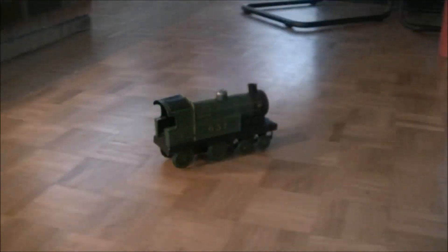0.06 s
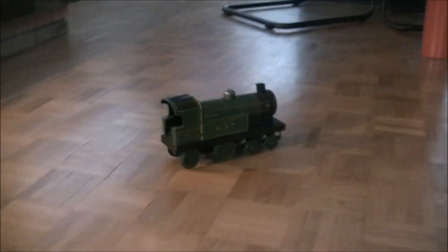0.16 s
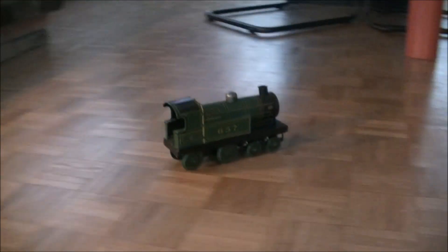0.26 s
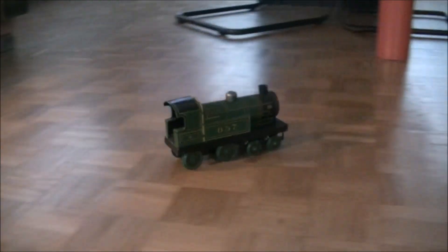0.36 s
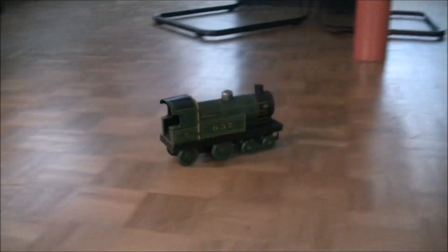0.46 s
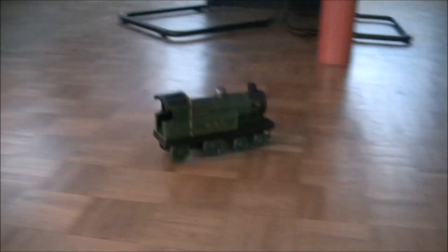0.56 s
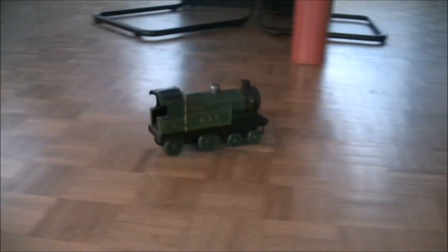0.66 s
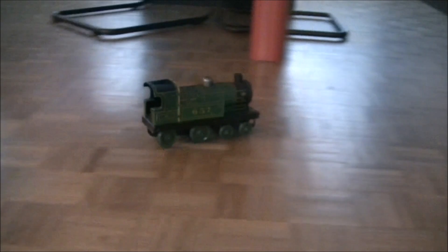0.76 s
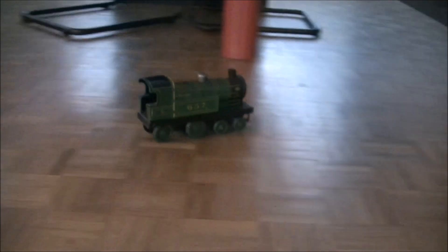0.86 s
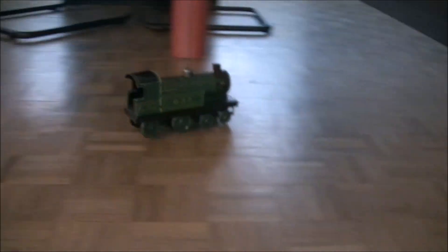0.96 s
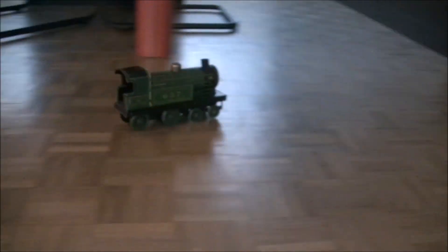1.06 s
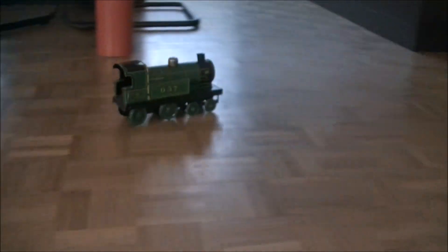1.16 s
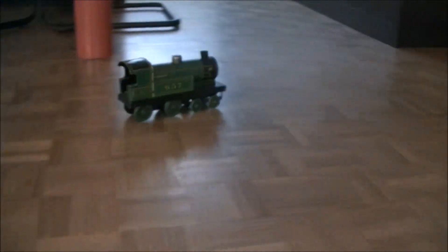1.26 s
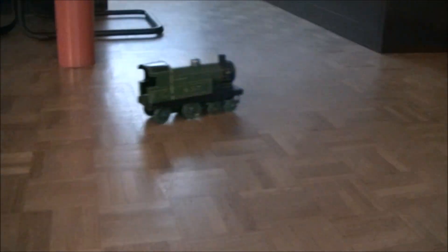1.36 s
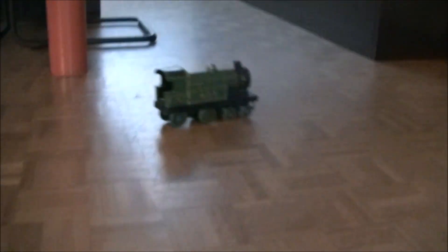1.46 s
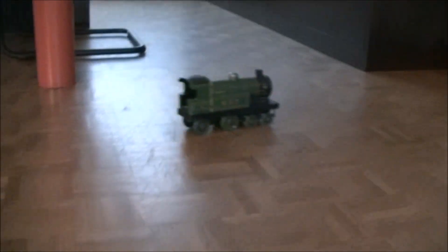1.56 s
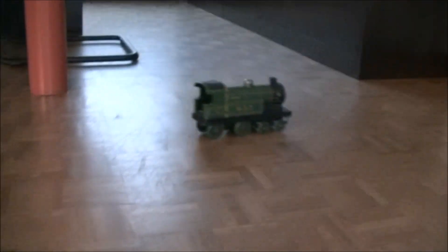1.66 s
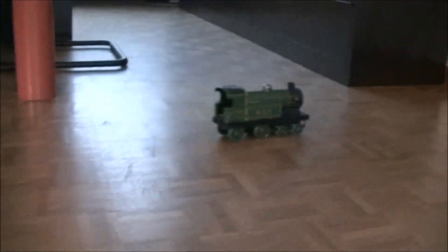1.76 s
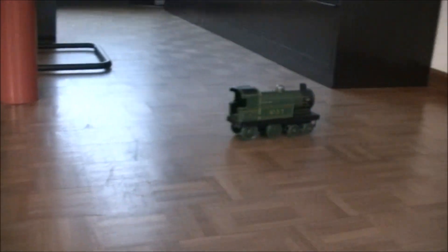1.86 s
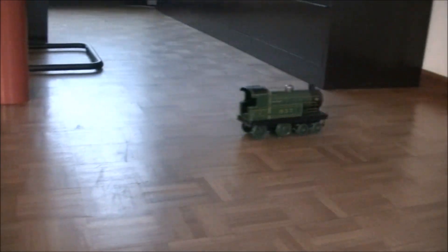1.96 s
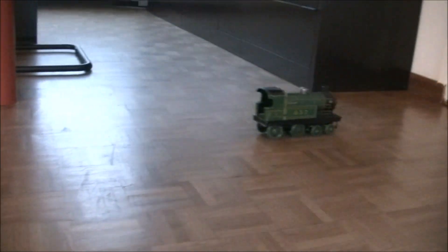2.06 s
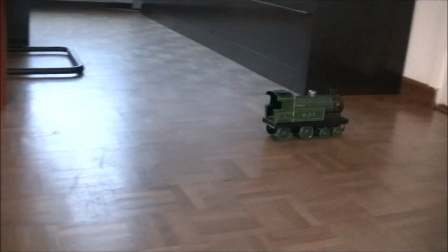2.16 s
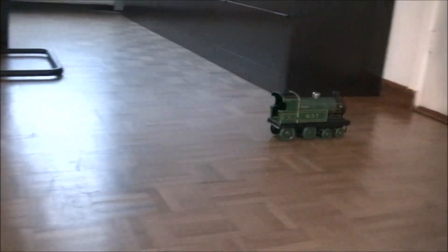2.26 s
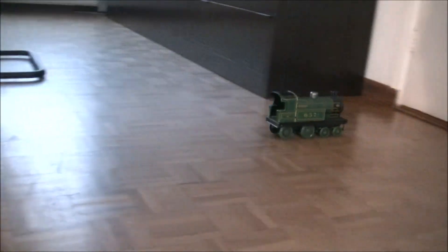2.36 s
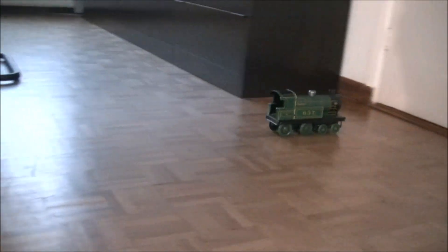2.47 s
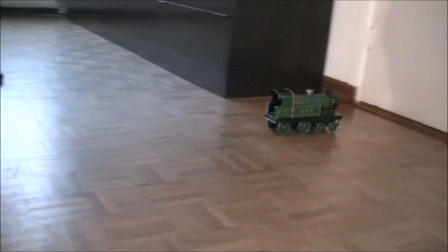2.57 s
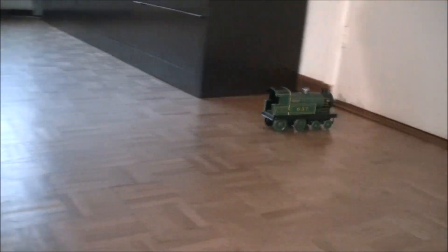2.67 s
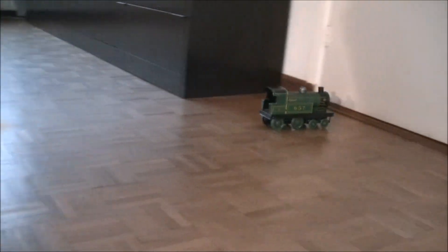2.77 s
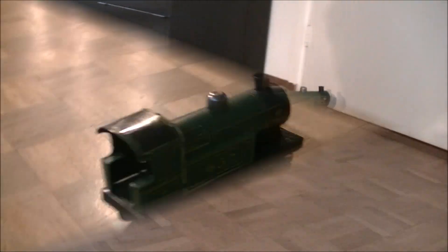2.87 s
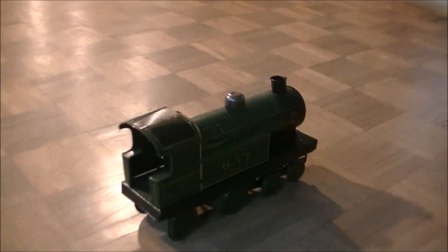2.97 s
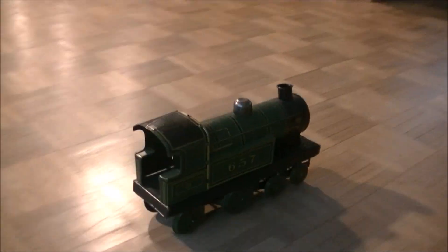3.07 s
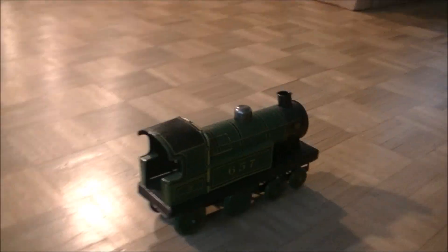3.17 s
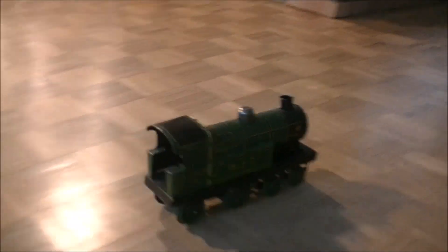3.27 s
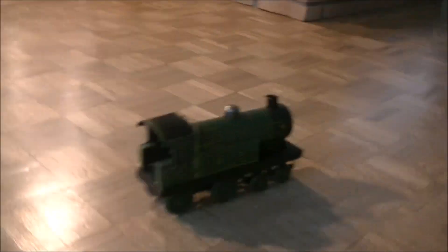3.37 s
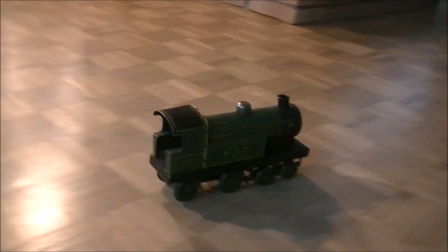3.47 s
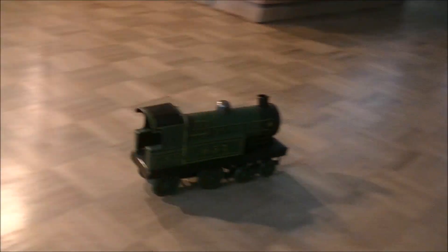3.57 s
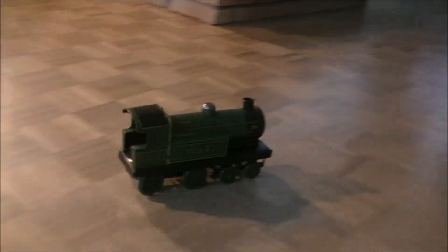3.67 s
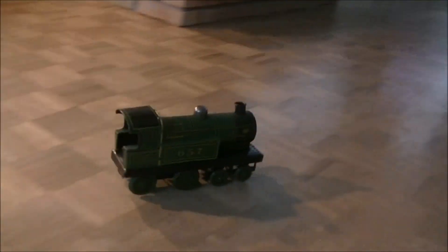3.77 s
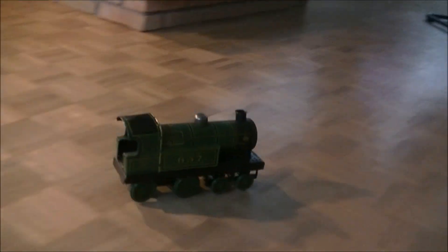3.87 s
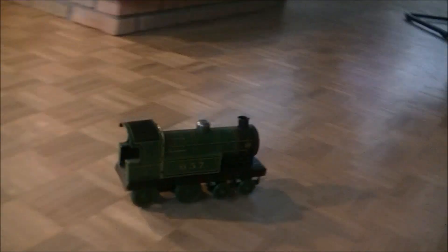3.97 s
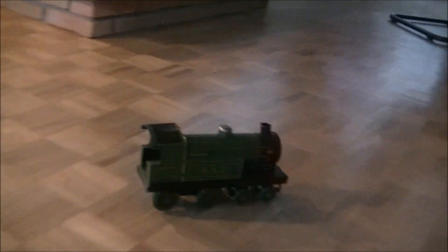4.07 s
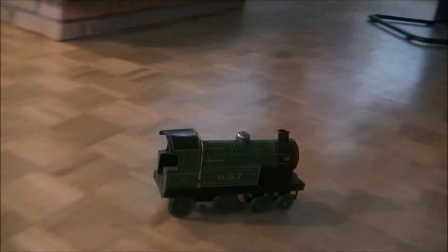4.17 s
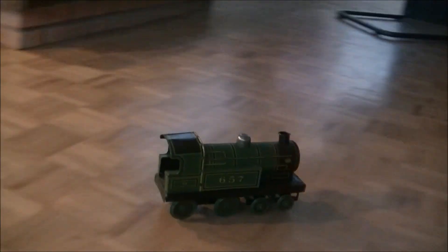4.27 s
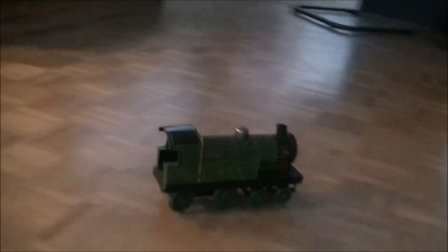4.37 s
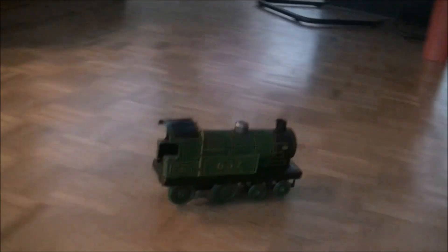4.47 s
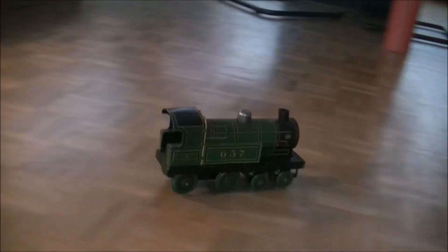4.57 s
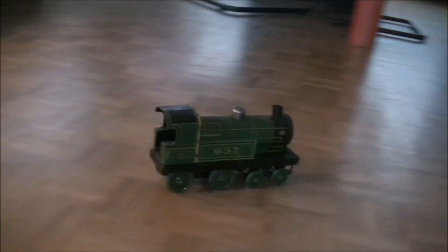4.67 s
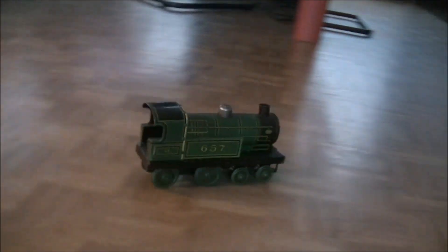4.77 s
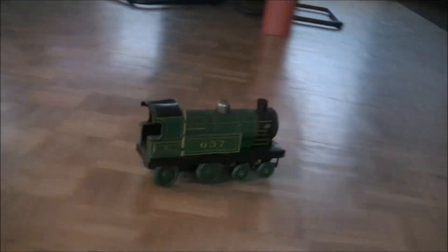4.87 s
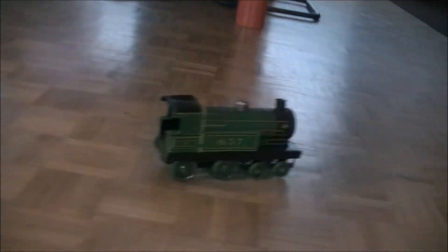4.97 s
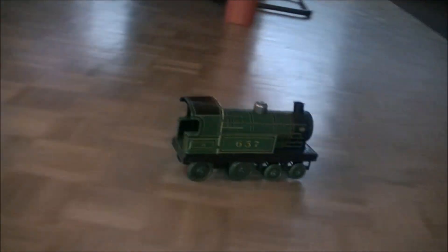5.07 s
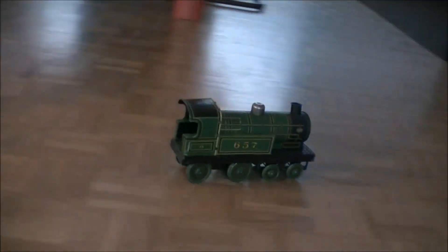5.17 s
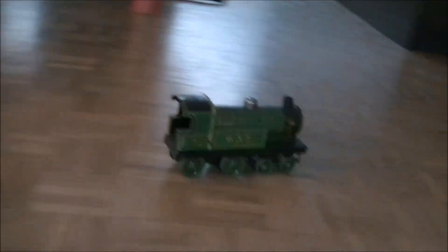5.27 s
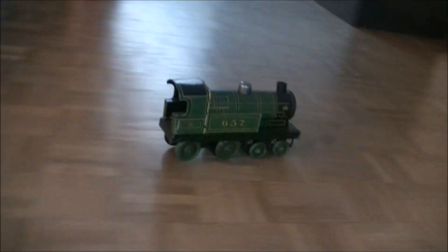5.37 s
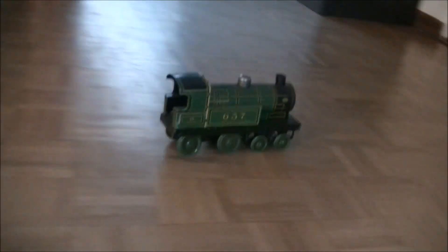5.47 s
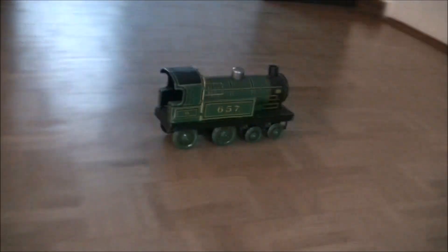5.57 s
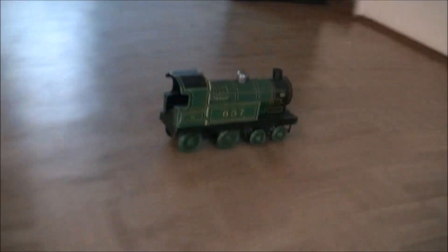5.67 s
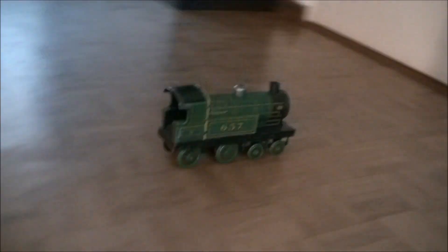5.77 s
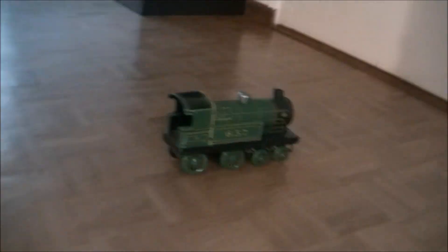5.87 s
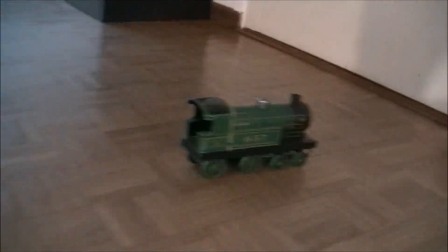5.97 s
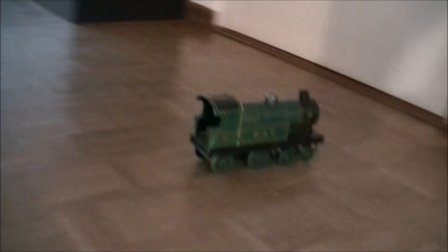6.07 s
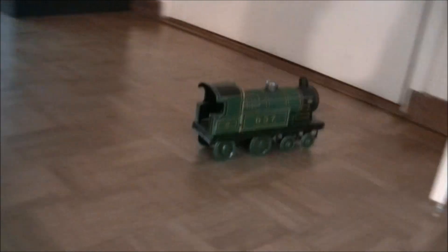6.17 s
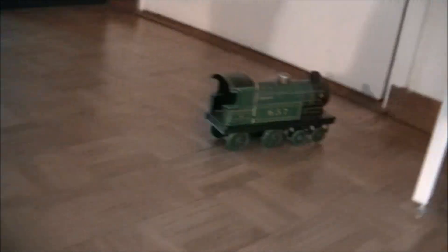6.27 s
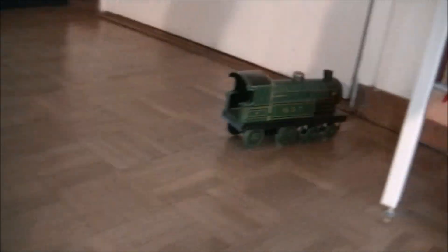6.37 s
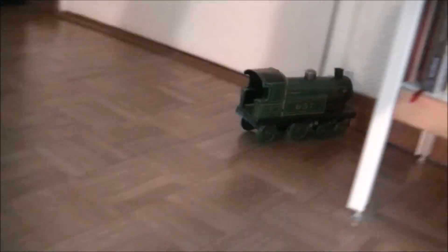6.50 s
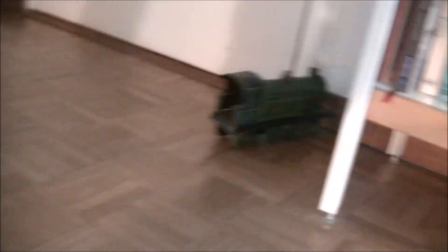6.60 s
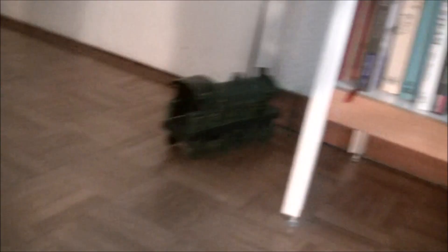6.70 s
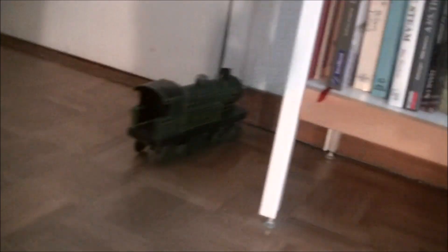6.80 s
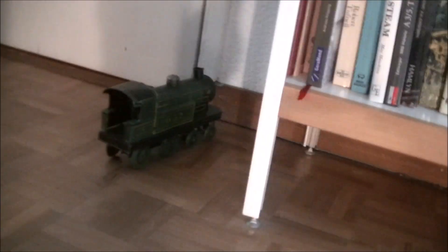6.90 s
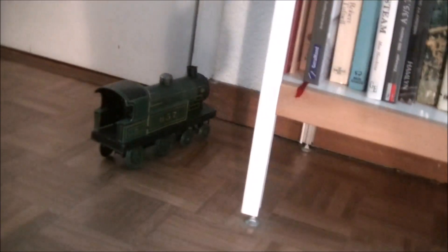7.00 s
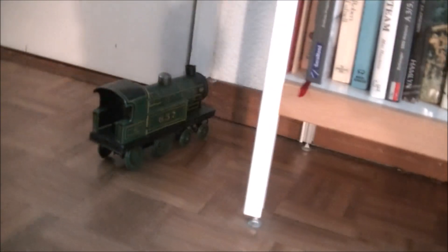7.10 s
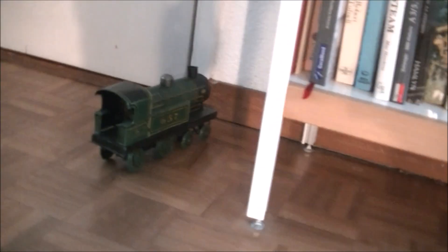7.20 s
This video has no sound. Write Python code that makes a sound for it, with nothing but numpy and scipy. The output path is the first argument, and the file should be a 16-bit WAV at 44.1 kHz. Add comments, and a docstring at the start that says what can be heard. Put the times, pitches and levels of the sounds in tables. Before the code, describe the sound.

A tin clockwork locomotive clatters and whirs across a parquet floor twice, with quick pulsing chirps, then knocks into a skirting board and stops.

```python
"""Clattering tin: a clockwork locomotive runs twice across a parquet floor, followed by a hand-held camera.
Slack gear teeth strike the shell at random; each impact triggers a noise burst and a decaying overtone.
Once a wheel turn the whir, a swept sine, swoops up into a ring of the body; tin knocks and ring flares stand out.
The first run is cut off in mid-clatter; the second ends against the skirting board and dies away in the room.
Bumps on the camera, a late dull thud, still air and hum lie behind."""
import sys
import numpy as np
from scipy import signal
from scipy.fft import rfft, irfft
from scipy.io import wavfile

SR = 44100
rng = np.random.default_rng(int(sys.argv[2]) if len(sys.argv) > 2 else 0)


def wav_out(sig):
    """Save sig, one row per channel (or a flat mono array), as 16-bit PCM at SR to the path in sys.argv[1]."""
    wavfile.write(sys.argv[1], SR, np.round(np.clip(np.atleast_2d(sig).T, -1, 1) * 32767).astype(np.int16))


N = 319275
TIME = np.arange(N) / SR
BINS_HZ = np.fft.rfftfreq(4096, 1 / SR)
CUT_S = 3.0935

# slow levels of each run, before trims: time_s, gear_rattle_db, fizz_db, shell_ring_db, wheel_grit_db
FIRST_RUN_LEVELS = [(0.0, -33, -45.5, -39.5, -38), (0.5, -33, -45, -33.5, -40),
                    (1.1, -34.0, -45.5, -43.5, -41), (1.55, -35.5, -47, -32.5, -40.5),
                    (1.95, -34.5, -45.5, -34, -42.0), (2.15, -35.5, -48, -35, -43.5),
                    (2.4, -34.5, -49, -36, -39.5), (2.72, -37.5, -48.5, -33, -43.5),
                    (2.95, -33.0, -46.5, -37.0, -39.5), (3.07, -30.5, -42, -36, -37.5)]
SECOND_RUN_LEVELS = [(3.1, -40.5, -49.5, -51, -53.5), (3.3, -35.5, -47.5, -36, -53.5),
                     (3.7, -37.5, -46.5, -39.5, -53), (4.1, -32, -43.0, -35, -49.0),
                     (4.9, -31, -43.0, -40, -48.5), (5.2, -30.0, -41.5, -35.5, -42.5),
                     (5.6, -31.0, -41.5, -34, -46), (6.2, -32, -42, -30, -46), (6.55, -29, -42, -30.5, -45),
                     (6.62, -24.0, -38.5, -48, -48.5), (6.7, -29.5, -38, -39.5, -42.5)]
# rolling on wood, one spectrum a run: freq_hz, density_db_per_hz
WHEEL_SPECTRA = [
    [(25, -35), (70, -22), (160, -16.5), (350, -14.5), (550, -9), (740, -4), (1300, 2.5), (1700, 0),
     (2600, -4), (5000, -55.5)],
    [(25, -48), (70, -20.5), (160, -13), (350, -11), (550, -11.5), (780, -7.5), (1200, -0.5), (1700, -6.5),
     (2600, -8), (5000, -70)],
]
# gear rattle in the shell: freq_hz, density_db_per_hz
SHELL_SPECTRUM = [(300, -41), (1000, -31), (1700, -4), (2300, -6.5), (2900, -7.5), (3500, -4.5),
                  (4000, -4.5), (4600, 1.5), (5200, -1), (5800, -12), (7000, -23), (10000, -20),
                  (16000, -31.5)]
# shell resonances: freq_hz, width_hz, level_db
SHELL_RESONANCES = [(1955, 76, -4), (3680, 330, -2.5), (4360, 140, -20)]
# treble of the rattle: freq_hz, density_db_per_hz
FIZZ_SPECTRUM = [(3000, -45), (5500, 14), (6300, 4), (7100, -0.5), (9000, 4), (10500, -7.5), (12200, -4.5),
                 (14000, -13), (15700, -8.5)]
# treble resonances of the tin: freq_hz, width_hz, level_db
FIZZ_RESONANCES = [(7705, 190, 9.7), (8420, 226, 13.5), (11360, 73, 5)]
# whir chirps, one a wheel turn, rarely a stray between; levels before trim: centre_s, level_db
CHIRP_EVENTS = [(.123, -26), (.322, -27.5), (.514, -26), (.702, -27.5), (.889, -25.5), (1.08, -29),
                (1.263, -24.5), (1.45, -26.5), (1.639, -29.5), (1.829, -25.5), (2.021, -28.5),
                (2.219, -27.5), (2.416, -30.5), (2.623, -28), (2.835, -28.5), (3.047, -26), (3.114, -38.5),
                (3.342, -33), (3.558, -31.5), (3.756, -33), (3.945, -31.5), (4.12, -35.5), (4.289, -35),
                (4.467, -38.5), (4.616, -36.5), (4.758, -33), (4.914, -34.5), (4.98, -38), (5.055, -33),
                (5.203, -34), (5.349, -31), (5.39, -36.5), (5.492, -32.5), (5.637, -33), (5.775, -31.5),
                (5.909, -33), (6.064, -27.5), (6.206, -32), (6.356, -30), (6.488, -28.5), (6.621, -39)]
# tin knocks and flares of the bright ring, with the hit on the skirting near the end;
# levels before trims: start_s, crack_db, bright_ring_db, low_ping_db, t60_s
CLACK_EVENTS = [(.2176, -28, -23, -42, .03), (.876, -20, -27, -32, .03), (1.736, -21, -22.5, -42, 0.027),
                (1.9445, -16, -25, -21, .027), (2.032, -22, -21.5, -46, 0.025),
                (2.2247, -24, -29, -25, 0.048), (2.9075, -20, -38, -34, .008), (3.0801, -5, -18, -31, .03),
                (3.0839, -9, -14.5, -28.5, .025), (3.09, -5.5, -19.5, -29, .025),
                (3.1619, -26, -24, -40, .03), (3.212, -39, -22.5, -51, 0.025),
                (4.0471, -27, -22, -42, 0.032), (4.863, -9.5, -28, -36, 0.011),
                (5.1838, -15, -28, -36, .008), (5.2104, -11.5, -20, -26, .02),
                (5.7153, -9.5, -21.5, -31, 0.022), (5.8255, -21, -28, -31, 0.023),
                (6.19, -32, -17, -39, 0.024), (6.3786, -12, -19, -41, 0.034),
                (6.4522, -9.5, -20, -33, 0.038), (6.526, -30, -24.5, -45, 0.027),
                (6.57, -1.5, -20, -23, 0.025), (6.604, -6, -40, -28, 0.009)]
# crack of a knock: freq_hz, density_db_per_hz
CLACK_SPECTRUM = [(300, -18), (1000, 3), (2300, -2), (4300, 12.5), (5500, -7), (6500, 0), (9000, -5),
                  (15000, -18.5)]
# soft bumps of the hand on the camera: centre_s, peak_db, pitch_hz
BUMP_EVENTS = [(.179, -31.5, 300), (0.244, -35, 330), (0.358, -40, 220), (0.384, -40, 218),
               (0.681, -46, 250), (1.632, -42, 260), (2.748, -46, 242), (4.865, -31.5, 263),
               (5.226, -33, 322), (5.271, -36, 340), (6.384, -45, 300)]
# dull thuds once the toy has stopped: start_s, level_db
THUD_EVENTS = [(6.95, -53.5), (6.964, -56)]
# thud: freq_hz, density_db_per_hz
THUD_SPECTRUM = [(60, -22.5), (130, -12), (180, -7.5), (280, -4), (440, -8), (600, -21.5), (1500, -16),
                 (4000, -28), (9000, -45)]
# floor resonances under the thud: freq_hz, width_hz, level_db
THUD_RESONANCES = [(170, 36, -3), (420, 58, -5.5), (871, 13, 0.5)]
# room decay: freq_hz, t60_s
ROOM_DECAY = [(150, 0.33), (700, 0.75), (2000, 0.64), (4000, 0.67), (8000, 0.51), (14000, 0.32)]
# still air: freq_hz, density_db_per_hz
AIR_SPECTRUM = [(25, -28), (60, -18), (90, -7), (130, -4), (400, -10), (1000, -25), (3000, -31),
                (8000, -28.5), (15000, -45)]
# difference between the two ears: freq_hz, side_db
STEREO_WIDTH = [(60, -21), (200, -11), (380, -18.5), (700, -38), (1300, -15.5), (2400, -11.5),
                (4400, -16.5), (8000, -5.5), (15000, -6.5)]
# microphone ports, level: freq_hz, left_over_right_db
PORT_TILT = [(700, 0.055), (1300, 1), (2400, 1), (4400, -1.9), (8000, -.8), (15000, -0.78)]
# microphone ports, phase: freq_hz, left_lead_rad
PORT_LEAD = [(1600, 0.02), (2900, -1.04), (4200, -0.3), (5500, -0.78), (8500, -0.74), (10500, 0)]

# tin modes left ringing: freq_hz, width_hz
BRIGHT_MODE, LOW_MODE = (5355, 76), (3720, 55)

SHELL_T60_S, FIZZ_T60_S = .02, .012
CHOKE_RMS_DB = 2.4  # loose parts choke the ring
LURCH_RMS_DB, LURCH_HZ = 0.66, 10  # uneven spring pull sways all the works together
FLARE_DB, FLARE_HZ = 5, 7.7  # shell ring flares and sinks on its own, at most by FLARE_DB
SLACK_DB, SLACK_HZ = 4.5, 9.5  # gears run slack: brief dips
TICKS_PER_S, TICK_DB, TICK_T60_S = 16, 13, 0.0036  # TICK_DB: peak over rattle rms
CHIRP_S, SKIRT_DB = .048, -15  # time the body sings; faint whir on the way up
TOP_HZ, BRISK_TURN_S, SLOW_HZ_PER_S = 1980.5, 0.1447, 478  # top pitch drops as a turn exceeds BRISK_TURN_S
ARCH_HZ = 56  # mean-shape pitch drop at either end of a chirp
DROOP_HZ, DROOP_FROM = 230, .72  # load returns: Hz per half length, onset in half lengths past the middle
WHIR_ROOM_DB = -13.5  # whir sent to the room
EDGE_HZ = 15800


def amp(db):
    """Decibels to gain."""
    return 10 ** (np.asarray(db) / 20)


def evened(x):
    """Scales to rms 1."""
    return x / np.sqrt(np.mean(x ** 2) + 1e-20)


def read(points, hz):
    """Reads a table on a log-frequency axis."""
    f, value = np.transpose(points)
    return np.interp(np.log(hz + 1), np.log(f + 1), value)


def add(mix, s, sound):
    """Mixes a sound in from time s."""
    part = mix[:, max(round(s * SR), 0):][:, :sound.shape[-1]]
    part += sound[..., :part.shape[1]]


def convolve(x, response):
    """Filters each channel and keeps the length."""
    x = np.atleast_2d(x)
    return signal.fftconvolve(x, np.atleast_2d(response), axes=1)[:, :x.shape[1]]


def colour(x, points, modes=()):
    """Minimum-phase filter from a smooth spectrum plus resonances."""
    power = amp(read(points, BINS_HZ)) ** 2
    for hz, width_hz, db in modes:
        power = power + amp(db) ** 2 / (1 + ((BINS_HZ - hz) / width_hz) ** 2 * 2) ** 2
    log_gain = np.log(np.r_[power, power[-2:0:-1]]) / 2
    response = np.fft.ifft(np.exp(signal.hilbert(log_gain).conj())).real
    return convolve(x, response)


def spread(pair):
    """Turns two unrelated signals into left and right, most alike near 700 Hz and widest in the treble."""
    side = colour(pair[1], STEREO_WIDTH)[0]
    return np.array([pair[0] + side, pair[0] - side])


def wander(rate_hz):
    """Slow random curve of rms 1."""
    hz = np.fft.rfftfreq(2 ** 19, 1 / SR)
    spectrum = rfft(rng.standard_normal(N), 2 * len(hz) - 2)
    return evened(irfft(spectrum / (1 + (hz / rate_hz) ** 2))[:N])


def teeth(per_s, spread_db, shake_db, shake_hz):
    """Impacts of slack gear teeth, clumping as the chassis shakes."""
    size_db = spread_db * np.minimum(rng.exponential(1, N), 4) + shake_db * wander(shake_hz)
    hits = rng.random(N) < per_s / SR
    return amp(size_db) * hits * rng.choice([-1, 1], N)


def burst(t60_s, size=4000):
    """A dense cluster of dying tin modes, as decaying noise: mid and side."""
    return evened(rng.standard_normal((2, size)) * amp(-60 * np.arange(size) / SR / t60_s))


def rattle(clicks, t60_s, snap, ping, ping_hz, count=240, size=1000):
    """Each impact lands on one of many spots: a snap, a short rattle, and one stronger overtone."""
    t, out, spots = np.arange(size) / SR, np.zeros((2, N)), []
    fade = ping * evened(amp(-60 * t / t60_s))
    for hz in np.linspace(*ping_hz, count):
        overtone = np.sin(2 * np.pi * (hz * t + rng.random((2, 1))))
        spot = burst(t60_s, size=size) + fade * overtone
        spot[0, 0] += snap
        spots.append(spot)
    at = np.flatnonzero(clicks)
    for i, which in zip(at, rng.integers(0, count, len(at))):
        add(out, i / SR, clicks[i] * spots[which])
    return evened(out)


def ring(x, hz, width_hz):
    """One tin mode as a two-pole resonator, with steep flanks."""
    r = np.exp(-np.pi * width_hz / SR)
    ringing = signal.lfilter([1 - r, 0, r - 1], [1, -2 * r * np.cos(2 * np.pi * hz / SR), r * r], x)
    flanks = signal.butter(2, [hz - 450, hz + 450], "band", fs=SR, output="sos")
    return signal.sosfilt(flanks, ringing)


def clockwork():
    """Gear and wheel impacts excite the works: shell rattle, fizz, shell ring and wheel grit."""
    clicks = teeth(per_s=950, spread_db=0.5, shake_db=1.77, shake_hz=45)
    fine = teeth(per_s=2600, spread_db=1.5, shake_db=2.5, shake_hz=40)
    rough = teeth(per_s=2000, spread_db=2.5, shake_db=1.1, shake_hz=25)

    shell = rattle(clicks, SHELL_T60_S, snap=17.7, ping=0.77, ping_hz=(1800, 6200))
    shell = colour(shell, SHELL_SPECTRUM, SHELL_RESONANCES)
    fizz = rattle(0.63 * clicks + fine, FIZZ_T60_S, snap=2.6, ping=0.53, ping_hz=(6000, 15000))
    fizz = colour(fizz, FIZZ_SPECTRUM, FIZZ_RESONANCES)

    # loose parts choke and free the ring
    struck = rattle(clicks, t60_s=0.015, snap=5, ping=0.13, ping_hz=(5300, 5600))
    singing = ring(struck, *BRIGHT_MODE) * amp(CHOKE_RMS_DB * wander(70))
    grit = rattle(rough, t60_s=0.015, snap=8.3, ping=0.26, ping_hz=(500, 1800))
    return shell, fizz, singing, grit


def ticks():
    """Loose rods and wheels tap the shell at random."""
    out = np.zeros((2, N))
    for i in np.flatnonzero(rng.random(N) < TICKS_PER_S / SR):
        tap = colour(burst(TICK_T60_S, size=800), SHELL_SPECTRUM)
        add(out, i / SR, amp(TICK_DB) * tap / abs(tap).max())
    return out


def running(levels, wheel_spectrum, textures, shell_db=1.5, fizz_db=3.14, ring_db=0.0, grit_db=1.5):
    """One run: the textures swell and sink with the spring's pull and the distance."""
    s, *curves_db = np.transpose(levels)
    shell, fizz, singing, grit = textures
    flare = amp(FLARE_DB * np.tanh(wander(FLARE_HZ)))
    layers = evened(shell) + ticks(), fizz, singing * flare, colour(grit, wheel_spectrum)
    trims_db = shell_db, fizz_db, ring_db, grit_db
    works = np.zeros((2, N))
    for x, db, trim_db in zip(layers, curves_db, trims_db):
        works += x / x[0].std() * amp(np.interp(TIME, s, db) + trim_db)
    lurch_db = LURCH_RMS_DB * wander(LURCH_HZ)
    slack_db = SLACK_DB * np.minimum(wander(SLACK_HZ) + 1, 0)
    return spread(works * amp(lurch_db + slack_db))


def chirps(jitter_hz=10, flutter_db=1.26, level_db=1.2, pan_db=2.5, variety=.35, lean=.15, steepness=12):
    """Once a turn the whir arches up into the body's resonance, sings out and droops, never twice alike."""
    out, jitter, flutter = np.zeros((2, N)), wander(104), wander(59)
    gaps_s = np.diff([s for s, db in CHIRP_EVENTS])
    # the longer neighbouring gap, so a stray chirp does not pass for a quick turn
    turns_s = np.maximum(np.r_[gaps_s[0], gaps_s], np.r_[gaps_s, gaps_s[-1]])
    shapes = rng.uniform(-0.85, 1, (len(CHIRP_EVENTS), 3))
    for (s, db), turn_s, (depth, skew, sag) in zip(CHIRP_EVENTS, turns_s, shapes):
        at = np.arange(round((s - CHIRP_S) * SR), round((s + CHIRP_S) * SR))
        u = 2 * (at / SR - s) / CHIRP_S  # -1 to 1 while the body sings
        top_hz = TOP_HZ - SLOW_HZ_PER_S * max(turn_s - BRISK_TURN_S, 0)
        arch_hz = ARCH_HZ * (1 + variety * depth) * (u - lean * skew) ** 2
        droop_hz = DROOP_HZ * (1 + .5 * sag) * np.maximum(u - DROOP_FROM, 0)
        hz = top_hz - arch_hz - droop_hz + jitter_hz * jitter[at]
        approach = amp(SKIRT_DB) * np.clip(2 * (u + 2), 0, 1) * (u < 0)
        resonance = np.maximum(1 / (1 + abs(u) ** steepness), approach)
        swell = amp(db + level_db + flutter_db * flutter[at]) * resonance
        tone = np.sqrt(2) * np.sin(2 * np.pi * np.cumsum(hz) / SR)
        add(out, at[0] / SR, tone * swell)
    return out * amp([[pan_db / 2], [-pan_db / 2]])


def clacks(start_s, end_s, crack_trim_db=-4.5, ring_trim_db=2.5, ping_trim_db=1.0):
    """Tin knocks and bright ring flares of one run: a noise burst as crack, and through two ringing modes."""
    out = np.zeros((2, N))
    for s, crack_db, ring_db, ping_db, t60_s in CLACK_EVENTS:
        if start_s <= s < end_s:
            blow = burst(max(t60_s, .003))
            voices = ((colour(blow, CLACK_SPECTRUM), crack_trim_db + crack_db),
                      (ring(blow, *BRIGHT_MODE), ring_trim_db + ring_db),
                      (ring(blow, *LOW_MODE), ping_trim_db + ping_db))
            add(out, s, sum(amp(db) * x / abs(x).max() for x, db in voices))
    return spread(out)


def room(x, tails, moves_per_s=2.5):
    """The echo pattern keeps changing as toy and camera move: tails fade in and out in turn."""
    turn = np.pi * moves_per_s * TIME
    echoes = np.zeros((2, N))
    for k, tail in enumerate(tails):
        echoes += convolve(x * np.cos(turn + np.pi * k / len(tails)), tail)
    return np.sqrt(2 / len(tails)) * echoes


def reflections(gap_s=0.0042):
    """Echoes from hard floor and walls for one position: noise decaying at a rate set by frequency."""
    hz, t, z = signal.stft(rng.standard_normal((2, SR)), SR, nperseg=256)
    decay = amp(-60 * t / read(ROOM_DECAY, hz)[:, None])
    tail = signal.istft(z * decay, SR, nperseg=256)[1]
    # silent for gap_s, full after twice that
    tail *= np.clip(np.arange(tail.shape[1]) / SR / gap_s - 1, 0, 1)
    return spread(tail / np.linalg.norm(tail[0]))


def bumps():
    """Each bump is one push and pull on the camera case."""
    out, t = np.zeros((2, N)), np.arange(-SR // 100, SR // 100) / SR
    for s, peak_db, hz in BUMP_EVENTS:
        u = 2 * np.pi * hz * t
        add(out, s + t[0], -amp(peak_db) * u * np.exp((1 - u ** 2) / 2))
    return out


def thuds(t60_s=0.63):
    """A low blow that booms on through the floor: decaying noise through floor resonances."""
    out = np.zeros((2, N))
    for s, db in THUD_EVENTS:
        boom = colour(burst(t60_s, size=14000), THUD_SPECTRUM, THUD_RESONANCES)
        add(out, s, amp(db) * evened(boom))
    return spread(out)


def background(air_db=-62, hum_db=-66, hum_hz=60):
    """Still air (coloured noise) and a low hum (sine), which come forward when the toy stops."""
    air = spread(evened(colour(rng.standard_normal((2, N)), AIR_SPECTRUM)))
    hum = np.sqrt(2) * np.sin(2 * np.pi * hum_hz * TIME)
    forward_db = np.interp(TIME, [6.55, 7.1], [-14, 2])  # added to both levels
    return (amp(air_db) * air + amp(hum_db) * hum) * amp(forward_db)


def scene():
    """Two runs joined by a hard cut."""
    textures, whir = clockwork(), chirps()
    tails = [reflections() for _ in range(3)]
    stall = amp(np.interp(TIME, [6.68, 6.78, 6.9], [0, -18, -60]))  # the skirting stops the wheels
    out = bumps() + thuds() + background()
    runs = ((FIRST_RUN_LEVELS, WHEEL_SPECTRA[0], 0, CUT_S),
            (SECOND_RUN_LEVELS, WHEEL_SPECTRA[1], CUT_S, N / SR))
    for levels, wheel_spectrum, start_s, end_s in runs:
        gate = (start_s <= TIME) & (TIME < end_s)
        works = running(levels, wheel_spectrum, textures) * stall
        works = (works + clacks(start_s, end_s)) * amp(-1.3)
        sent = gate * (amp(-6.0) * works + amp(WHIR_ROOM_DB) * whir).mean(0)
        out += gate * (works + whir + room(sent, tails))  # the cut silences echoes too
    return out


def record(dry):
    """The two microphone ports colour the sound a little differently; then the band limit."""
    hz = np.fft.rfftfreq(2 * N, 1 / SR)
    half = amp(read(PORT_TILT, hz) / 2) * np.exp(.5j * read(PORT_LEAD, hz))
    heard = irfft(rfft(dry, 2 * N) * np.array([half, 1 / half]))[:, :N]
    lowpass = signal.firwin(511, EDGE_HZ, window=("kaiser", 9), fs=SR)
    return signal.oaconvolve(heard, lowpass[None], "same")


dry = scene()
out = record(dry)
wav_out(out)
```